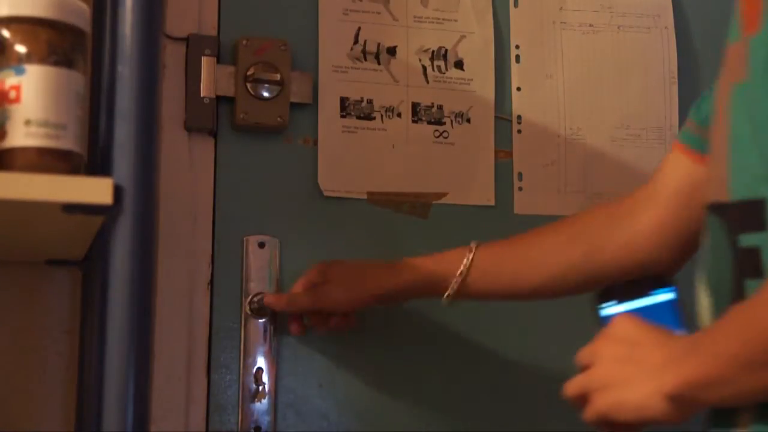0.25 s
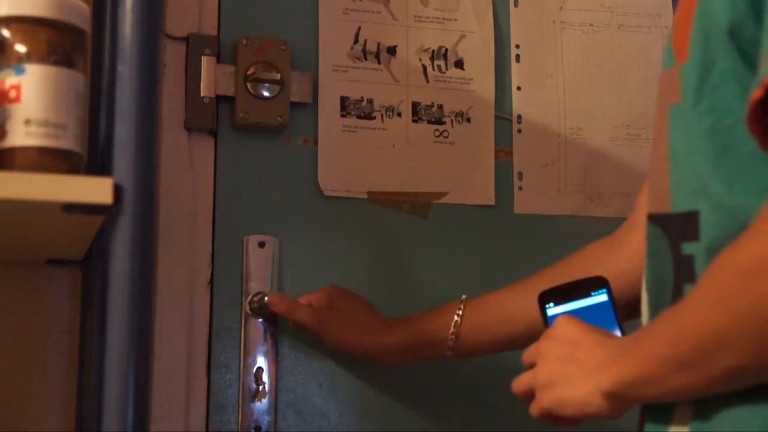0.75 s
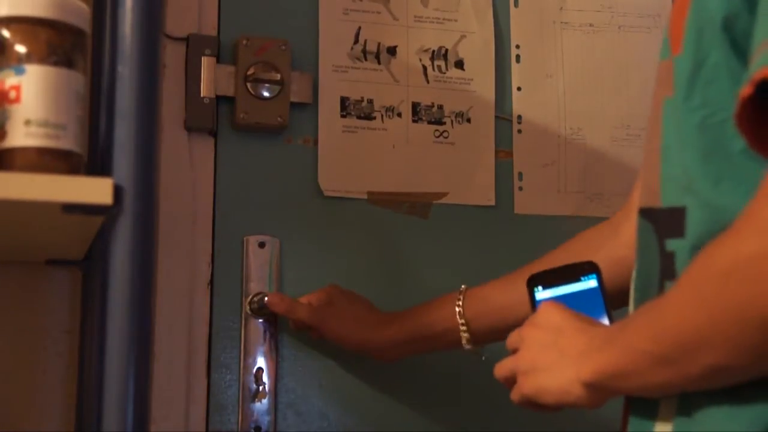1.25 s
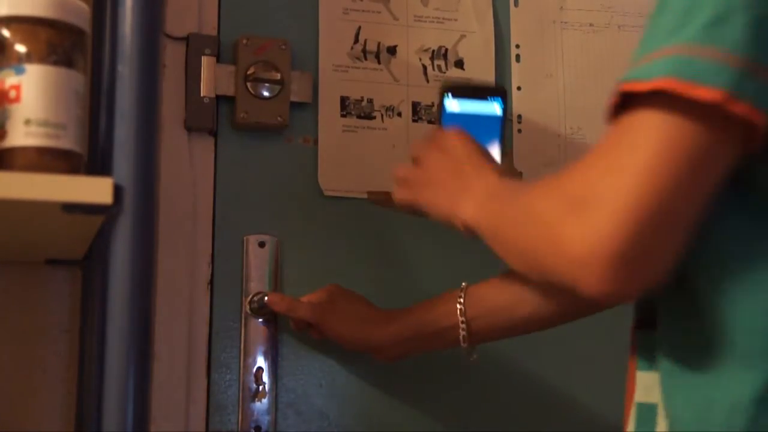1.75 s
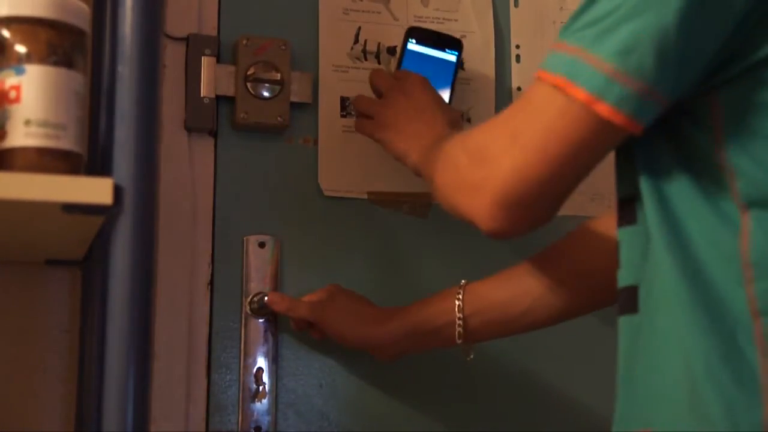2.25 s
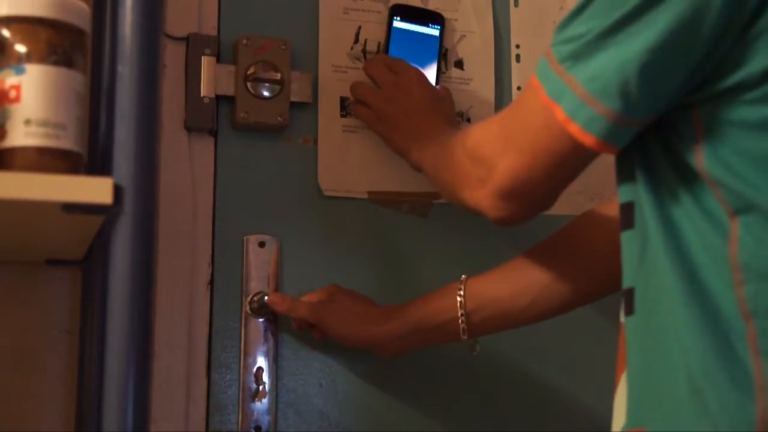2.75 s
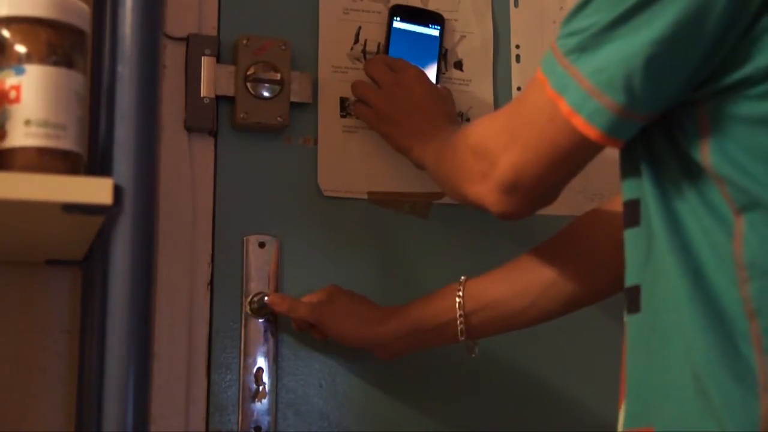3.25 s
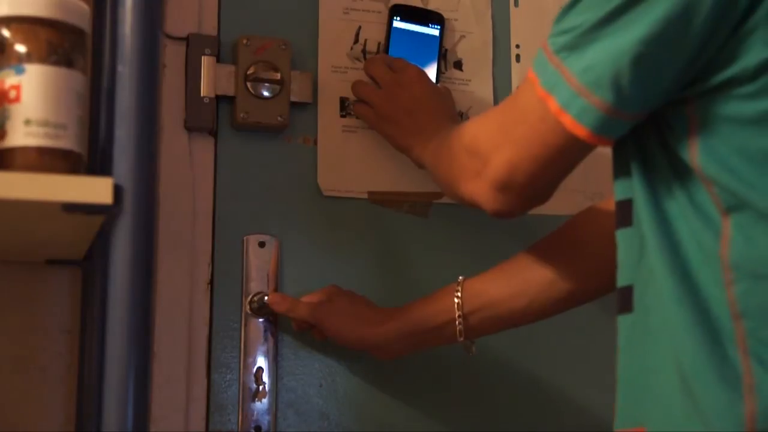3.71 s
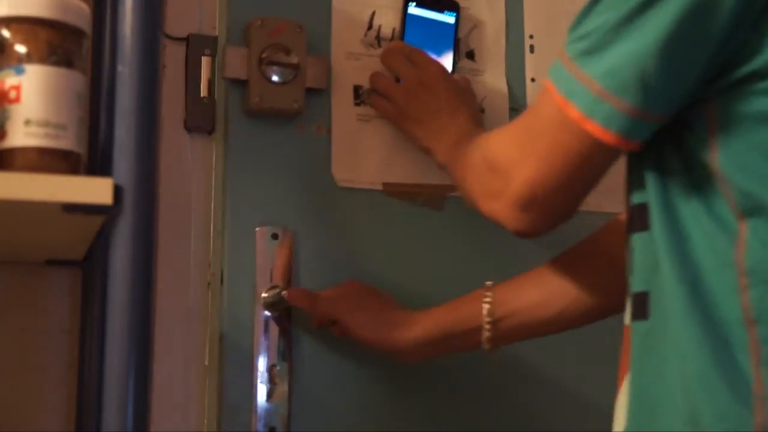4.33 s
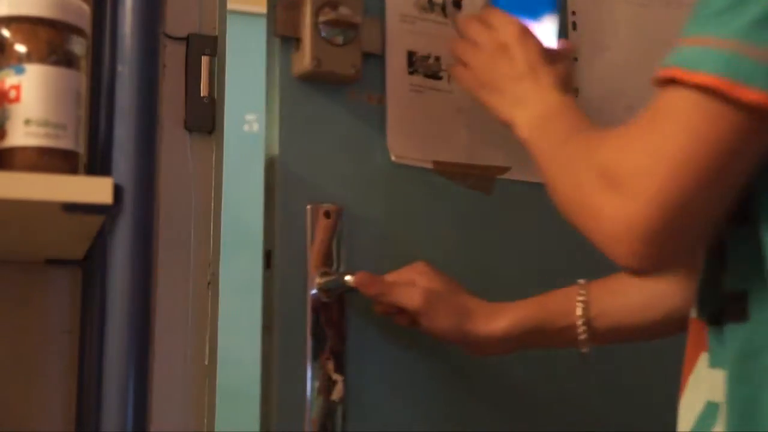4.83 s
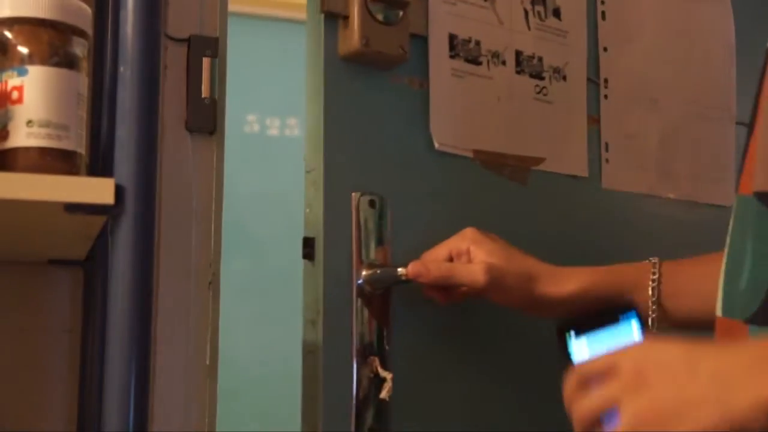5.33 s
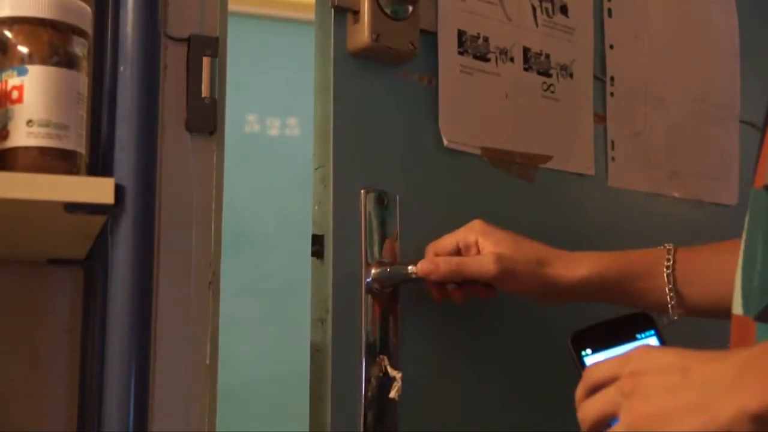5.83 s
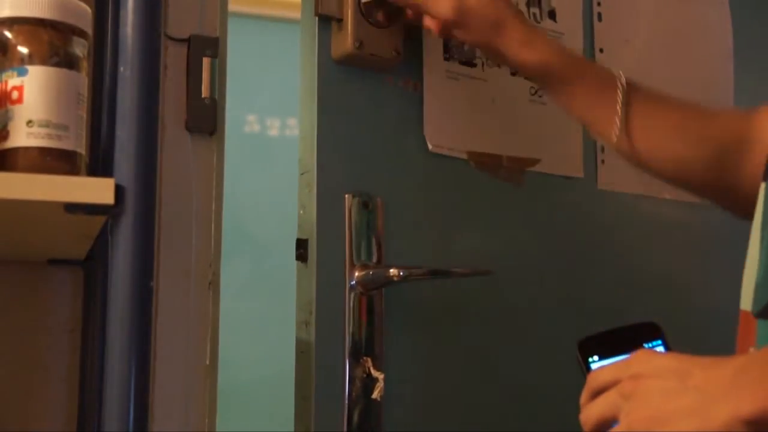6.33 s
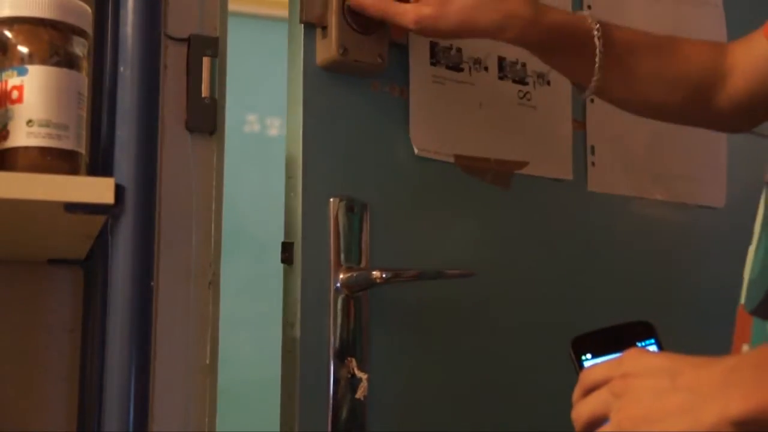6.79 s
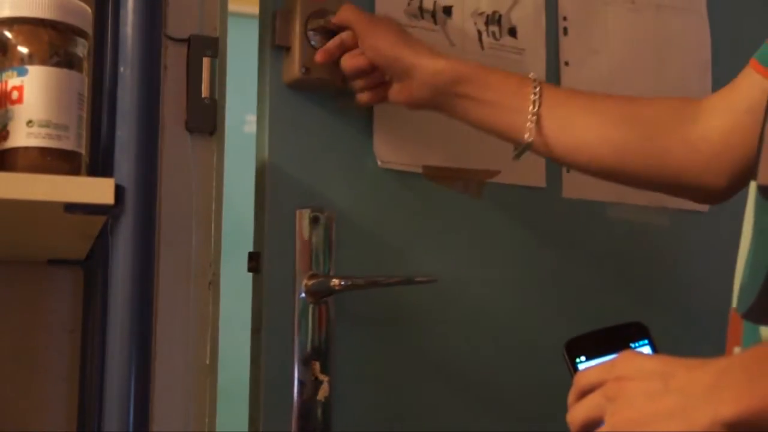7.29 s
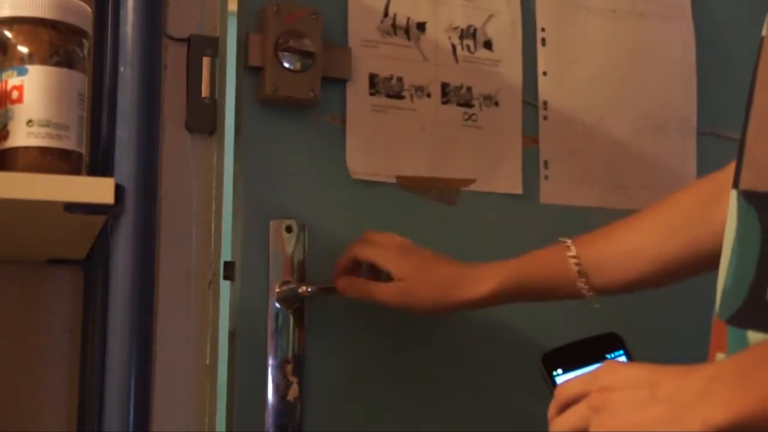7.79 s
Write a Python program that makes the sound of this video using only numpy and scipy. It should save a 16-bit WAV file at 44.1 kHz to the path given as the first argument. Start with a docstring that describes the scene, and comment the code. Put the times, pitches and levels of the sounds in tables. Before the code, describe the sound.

A faint hiss and soft, patchy rustling of cloth and paper run throughout, heard from close to a door in a small, hard-walled room. From about 0.2 to 1.2 seconds, a lever handle is worked, making a cluster of light knocks, metal scrapes and clicks on the hollow door. Scattered small clicks and taps follow, with a sharper click at 3.6 seconds. At about 4.2 seconds the bolt grinds and snaps back with a sharp clack, by far the loudest sound, thumping the door. Around 4.9 to 5.3 seconds the hinge gives one thin, very high squeak among light clicks and scrapes. Faint taps continue, then a firmer click and knock come at 6.7 seconds, a double knock at 7.3, and a last light knock near 7.8. Each contact has a short room echo and a faint, longer stairwell tail.

```python
"""Soft rustling and light knocks, then the clicks of a lever handle and rim latch worked on a hollow door
in a small hard room. Midway the bolt snaps back with a clack, and the hinge squeaks once.
Each contact is a short rattle that rings the metalwork or thumps the door leaf.
The microphone stands in a nook by a shelf, whose reflections notch everything that it hears;
the walls answer from close by, a stairwell from farther off."""
import sys
import numpy as np
from scipy import signal
from scipy.fft import rfft, irfft, next_fast_len
from scipy.io import wavfile

SR = 44100
rng = np.random.default_rng(int(sys.argv[2]) if len(sys.argv) > 2 else 0)


def generate_wav(signal):
    """Clip the signal to [-1, 1] and save it as 16-bit WAV at the path in sys.argv[1]."""
    frames = np.transpose(np.atleast_2d(signal))
    scaled = np.clip(frames, -1, 1) * 32767
    pcm = np.round(scaled).astype(np.int16)
    wavfile.write(sys.argv[1], SR, pcm)


N = 355137


def from_db(db):
    """Decibels to gain."""
    return 10 ** (np.asarray(db) / 20)


def unit_rms(x):
    """Scale to unit rms."""
    return x / np.sqrt(np.mean(x ** 2) + 1e-20)


def in_time(rows):
    """Columns of a timed curve, one value a sample."""
    times, *columns = np.transpose(rows)
    return [np.interp(np.arange(N) / SR, times, column) for column in columns]


def at_hz(points, hz):
    """Read a curve on a log-frequency axis."""
    point_hz, values = np.transpose(points)
    return np.interp(np.log(np.maximum(hz, 1)), np.log(point_hz), values)


def colour(x, spectrum):
    """Shape a signal by a dB spectrum."""
    size = next_fast_len(x.shape[-1])
    hz = np.arange(size // 2 + 1) * SR / size
    return irfft(rfft(x, size) * from_db(at_hz(spectrum, hz)), size)[..., :x.shape[-1]]


def drift(rate_hz):
    """Slow random wander of unit rms."""
    pole = np.exp(-2 * np.pi * rate_hz / SR)
    wander = signal.lfilter([1], [1, -2 * pole, pole * pole], rng.standard_normal(N + SR))
    return unit_rms(wander[SR:])


# Likeness of left and right at the microphone: (frequency [Hz], correlation [0..1])
LIKENESS = [(60, 0.4), (180, 1), (550, 0.87), (1650, 0.28), (4970, 0.03), (15000, 0.046)]
def stereo_noise(size):
    """White noise, alike in both channels in the bass and nearly unrelated in the treble."""
    mid, side = rfft(rng.standard_normal((2, size)))
    alike = np.clip(at_hz(LIKENESS, np.arange(len(mid)) * SR / size), -1, 1)
    left_right = np.sqrt(1 + alike) * mid + np.sqrt(1 - alike) * side * [[1], [-1]]
    return irfft(left_right, size) / np.sqrt(2)


# Noise floor at the microphone: (frequency [Hz], relative density [dB])
HISS_SPECTRUM = [(35, -52), (60, -41), (212, -13.5), (281, -9), (607, -8.5), (842, -0.5), (1380, -14.5),
                 (1860, -13), (7400, -15.5), (14200, -36), (16000, -57)]
def hiss():
    """Faint steady noise, unrelated between the channels."""
    return from_db(-59.5) * unit_rms(colour(rng.standard_normal((2, N)), HISS_SPECTRUM))


# Air moving right at the microphone: (time [s], level [dB])
AIR_LEVELS = [(0.0, -85), (0.38, -87), (0.4, -74), (0.61, -71), (0.81, -83), (0.94, -67), (1.03, -68),
              (1.12, -57), (1.25, -68), (1.46, -83), (1.52, -81), (1.64, -68), (1.68, -68), (1.88, -74),
              (2.04, -71), (2.13, -77), (2.24, -83), (2.73, -82), (2.94, -89), (3.11, -83), (3.27, -82),
              (3.38, -84), (3.92, -92), (4.06, -84), (4.19, -68), (4.26, -71), (4.39, -87), (4.59, -89),
              (5.16, -87), (5.31, -79), (5.45, -96), (6.19, -81), (7.67, -91), (7.73, -83), (7.98, -84),
              (8.05, -80)]
def air_rumble():
    """Moving air presses unevenly on the microphone's ports."""
    level_db, = in_time(AIR_LEVELS)
    low_band = signal.butter(3, [18, 62], "band", fs=SR, output="sos")
    return from_db(level_db) * unit_rms(signal.sosfilt(low_band, stereo_noise(N)))


# Brushing, heard dry at the microphone: (time [s], dull level [dB], bright level [dB])
RUSTLE_LEVELS = [(0.0, -59.5, -54), (0.13, -64.5, -65.5), (0.27, -62.5, -63), (0.56, -59.5, -65),
                 (0.74, -50, -56.5), (0.9, -62.5, -64.5), (1.12, -44, -57.5), (1.23, -45, -48),
                 (1.34, -62, -62.5), (1.7, -64.5, -65.5), (1.99, -57.5, -62.5), (2.33, -69.5, -71.5),
                 (2.64, -61, -66.5), (2.78, -62.5, -63.5), (3.25, -65.5, -72.5), (3.65, -63.5, -61),
                 (3.97, -68.5, -71.5), (4.21, -58.5, -64), (4.33, -42.5, -40), (4.37, -50, -44),
                 (4.66, -58, -59.5), (4.91, -61, -59.5), (5.07, -63, -66), (5.2, -59, -55),
                 (5.34, -48.5, -65), (5.67, -65, -67.5), (6.1, -61, -65), (6.41, -65.5, -71),
                 (6.68, -63.5, -66), (6.88, -55, -61), (7.13, -66.5, -67.5), (7.35, -53, -65),
                 (7.46, -44, -49.5), (7.55, -55.5, -54), (7.76, -58, -64), (8.05, -59, -62.5)]
# Colours of its two layers: (frequency [Hz], relative density [dB])
DULL_SPECTRUM = [(71, -77), (120, -28.5), (271, -13), (547, -5), (597, -9.5), (872, -9), (1600, -16.5),
                 (2080, -33), (3520, -120)]
BRIGHT_SPECTRUM = [(760, -17), (1300, 1), (2670, -0.5), (3550, -8), (3850, -2), (5400, -7.5), (9000, -25.5),
                   (11700, -69), (19800, -120)]
def rustle():
    """Cloth, skin and paper brush in patches: a dull and a bright noise, each flickering."""
    dull_db, bright_db = in_time(RUSTLE_LEVELS)
    dull = unit_rms(colour(stereo_noise(N), DULL_SPECTRUM))
    dull *= from_db(dull_db + 2.5 + 2.26 * drift(16))
    bright = unit_rms(colour(stereo_noise(N), BRIGHT_SPECTRUM))
    bright *= from_db(bright_db + 5.5 + 1.13 * drift(20.5))
    return dull + bright


# Decay of the small room around the microphone: (frequency [Hz], t60 [s])
ROOM_T60 = [(150, 0.28), (400, 0.24), (1000, 0.26), (2800, 0.19), (7000, 0.22), (14000, 0.17)]
ECHO_OVER_DIRECT_DB, STAIRWELL_DB, STAIRWELL_T60_RATIO = 3, -25.5, 4.3
def room(source):
    """Direct sound, dense near echoes dying band by band, and the longer tail of the stairwell."""
    t = np.arange(SR) / SR
    noise, tail = stereo_noise(SR), 0
    edges_hz = 60 * 2 ** np.arange(0, 8.6, .5)   # half octaves
    for low, high in zip(edges_hz, np.minimum(edges_hz[1:], .45 * SR)):
        band = signal.sosfilt(signal.butter(2, [low, high], "band", fs=SR, output="sos"), noise)
        t60 = at_hz(ROOM_T60, np.sqrt(low * high))
        walls = from_db(-60 * t / t60) / np.sqrt(t60)
        stairwell = from_db(STAIRWELL_DB - 60 * t / t60 / STAIRWELL_T60_RATIO)
        tail = tail + band * (walls + stairwell)
    tail *= np.clip(t / 0.0028, 0, 1)   # echoes need time to arrive
    tail = from_db(ECHO_OVER_DIRECT_DB) * tail / np.sqrt(np.sum(tail ** 2) / 2)
    direct = np.stack([source, np.roll(source, 3)])   # reaches the right side 3 samples later
    return direct + signal.fftconvolve(source[None], tail, axes=1)[:, :N]


# Squeak at the hinge side of the door: (time [s], pitch [Hz], level [dB])
SQUEAK = [(4.92, 5408, -70), (4.936, 5617, -55), (4.968, 5571, -47), (5.096, 5846, -39), (5.106, 5846, -71),
          (5.146, 5836, -47), (5.214, 5756, -67), (5.298, 5711, -51), (5.33, 5680, -76)]
def hinge(octave_db=-30):
    """Stick-slip locked to one pin resonance: a throbbing whistle with a faint octave."""
    hz, level_db = in_time(SQUEAK)
    t = np.arange(N) / SR
    turning = (t > SQUEAK[0][0]) & (t < SQUEAK[-1][0])
    phase = 2 * np.pi * np.cumsum(hz * (1 + 0.0078 * drift(56))) / SR
    tone = np.sin(phase) + from_db(octave_db) * np.sin(2 * phase)
    return turning * from_db(level_db + 2.5 * drift(40)) * tone


def rattle(times, levels_db, rises, size=4000):
    """Each contact is a burst of uneven micro-impacts that swells and dies; its level sets its energy."""
    force = np.full(N, 1e-18)
    shape = (len(times), size)
    grains = rng.standard_normal(shape) * from_db(3.1 * rng.exponential(1, shape))
    for time, level_db, rise, impacts in zip(times, levels_db, rises, grains):
        age = np.arange(size) / SR / np.clip(rise, .0004, .02)
        burst = impacts * age * np.exp(-age)
        burst *= from_db(level_db) / np.sqrt(np.sum(burst ** 2))
        start = round(time * SR)
        force[start:start + size] += burst[:N - start]
    return force


def ring(force, modes):
    """A force sets every mode of a body ringing; nothing radiates far below the lowest mode."""
    body = 0
    for k, (hz, level_db, t60) in enumerate(modes):
        pole, angle = from_db(-60 / (t60 * SR)), 2 * np.pi * hz / SR
        mode = signal.lfilter([0, np.sin(angle)], [1, -2 * pole * np.cos(angle), pole * pole], force)
        body = body + (-1) ** k * from_db(level_db) * mode
    low_cut = signal.butter(4, 0.77 * modes[0][0], "high", fs=SR, output="sos")
    return signal.sosfilt(low_cut, body)


# Knocks at the door: (time [s], case level [dB], leaf level [dB], frame level [dB], rattle rise [s])
KNOCKS = [(0.207, -51, -53, -73, 0.007), (0.268, -42.5, -49, -67.5, 0.0074), (0.439, -55, -57, -59, 0.0043),
          (0.559, -41, -42, -65, 0.0082), (0.68, -36, -41, -57, 0.0081), (0.697, -32, -44, -61, 0.007),
          (0.842, -40, -43, -61, 0.007), (0.919, -54, -40, -62, 0.0053), (1.056, -38, -45, -54, 0.007),
          (1.102, -28, -37, -43, 0.0059), (1.201, -34, -43, -50.5, 0.007), (1.511, -47.5, -47, -54, 0.0058),
          (1.549, -49, -51, -55, 0.0087), (1.619, -49, -48, -56, 0.0048), (1.844, -46, -46.5, -57, 0.007),
          (1.935, -33.5, -39, -61, 0.0052), (2.144, -47.5, -63, -78, 0.007),
          (2.635, -38.5, -50, -45, 0.0088), (2.853, -40.5, -58, -70, 0.0049),
          (3.413, -45.5, -57, -77, 0.0063), (3.613, -33.5, -58, -73, 0.0059),
          (4.191, -18, -29.5, -37, 0.0074), (4.23, -15, -25, -48.5, 0.0062), (4.844, -37, -56, -73, 0.0051),
          (4.975, -39.5, -53, -74, 0.0057), (5.161, -40, -61, -71, 0.0061),
          (5.199, -43, -60, -76.5, 0.0079), (5.274, -37, -44.5, -55, 0.007),
          (5.598, -43.5, -46, -68, 0.0056), (5.829, -46, -55, -66, 0.0056),
          (5.928, -41.5, -59, -70, 0.0085), (6.016, -48, -55, -76, 0.0085), (6.207, -40, -59, -74, 0.0049),
          (6.695, -24.5, -40, -73, 0.0074), (6.703, -29, -46, -71, 0.0051),
          (7.303, -27, -31.5, -64, 0.0082), (7.343, -24, -30.5, -59, 0.0055),
          (7.752, -36, -44, -55, 0.0048)]
# Modes of the parts they shake: (frequency [Hz], level [dB], t60 [s])
CASE_MODES = [(684, 1.5, 0.057), (795, -1.5, 0.043), (864, -2.5, 0.049), (940, 1, 0.052),
              (1060, -1.5, 0.045), (1126, -3.5, 0.048), (1248, -2.5, 0.033)]
LEAF_MODES = [(306, -2.5, .1), (358, -3.5, 0.1), (411, 0.5, 0.13), (471, 1.5, 0.094), (544, -1, 0.11)]
FRAME_MODES = [(135, -5.5, .15), (163, -1.5, 0.15), (200.4, 3, 0.21)]
def door():
    """Knocks ring the lock case, the hollow leaf and the frame."""
    times, case_db, leaf_db, frame_db, rises = np.transpose(KNOCKS)
    case = ring(rattle(times, case_db, rises), CASE_MODES)
    leaf = ring(rattle(times, leaf_db, rises), LEAF_MODES)
    frame = ring(rattle(times, frame_db, rises), FRAME_MODES)
    return from_db(-3.5) * case + from_db(-1) * leaf + from_db(-0.5) * frame


# Sharp clicks at the latch, and slips where its parts grind over each other:
# (time [s], plate level [dB], bolt level [dB], tick level [dB], rattle rise [s])
CLICKS = [(0.844, -31.5, -36, -51, 0.0009), (1.1993, -26, -28.5, -39, 0.00098),
          (1.938, -32.5, -35, -50, 0.0012), (2.6255, -39.5, -39, -53, 0.0012),
          (2.842, -44, -44, -39, 0.0012), (3.41, -48, -46, -50, 0.0012), (3.6095, -23, -24, -26, 0.0016),
          (4.23, -6, -9, -5, 0.0012), (4.666, -43, -40, -59, 0.0012), (4.8414, -31.5, -34, -38, 0.00075),
          (5.1603, -41.5, -38, -46, 0.0017), (6.203, -42, -38, -51, 0.0014),
          (6.6925, -31.5, -34, -40, 0.0012), (7.342, -26, -28, -35, 0.0015)]
SLIPS = [(0.27, -53, -50, -55, 0.0082), (0.56, -44, -48, -62, .012), (0.692, -35.5, -35, -35, 0.0044),
         (1.0, -61, -58, -65, 0.0046), (1.058, -26, -31.5, -49, 0.0057), (1.102, -39, -53, -60, .006),
         (1.184, -30, -37, -48, 0.0083), (1.375, -57, -48, -63, 0.0062), (2.14, -51, -54, -62, 0.0044),
         (2.852, -42, -43, -43, 0.004), (4.188, -12, -15, -20, 0.0062), (4.236, -13, -17, -20, 0.0086),
         (4.826, -36, -35, -30, 0.0074), (4.967, -42, -40, -42, 0.0064), (5.19, -46, -53, -57, .012),
         (5.23, -44, -49, -60, .012), (5.274, -41, -47, -58, .012), (5.32, -45, -49, -60, 0.0095),
         (5.385, -67, -65, -54, .008), (6.698, -39, -39, -51, 0.0043), (7.306, -37, -44, -62, 0.0097),
         (7.743, -38, -50.5, -62, 0.0047)]
# Modes of the lever plate and the bolt: (frequency [Hz], level [dB], t60 [s])
PLATE_MODES = [(1674, -1, 0.033), (1801, 1, 0.045), (1970, 0.5, 0.039), (2080, -4.5, 0.057),
               (2227, 0, 0.025)]
BOLT_MODES = [(2670, 1, 0.016), (2970, -1, 0.029), (3274, -1, 0.021), (3800, 1, 0.022), (4150, 1.5, 0.024),
              (4500, -2, .02), (4990, 1, 0.0093)]
# Tick of metal on metal: (frequency [Hz], gain [dB])
TICK_SPECTRUM = [(4000, -35), (5200, 6), (7700, 8.5), (9500, -7), (12500, -22), (16000, -21)]
def latch(contacts):
    """Lever plate and bolt ring briefly; the contact itself ticks in the treble."""
    times, plate_db, bolt_db, tick_db, rises = np.transpose(contacts)
    plate = ring(rattle(times, plate_db, rises), PLATE_MODES)
    bolt = ring(rattle(times, bolt_db, rises), BOLT_MODES)
    tick = colour(rattle(times, tick_db, rises), TICK_SPECTRUM)
    return from_db(-3) * plate + from_db(0.5) * bolt + from_db(23.5) * tick


def scene():
    """Over hiss, rumble and rustle, two places on the door sound, each with its own echoes."""
    noise_floor = hiss()
    clicks_and_squeak = room(latch(CLICKS) + hinge())
    slips_and_knocks = room(latch(SLIPS) + door())
    return noise_floor + rustle() + air_rumble() + from_db(-1.5) * (clicks_and_squeak + slips_and_knocks)


# Four notches and a slight treble lift in the nook: (frequency [Hz], width [Hz], gain [dB])
NOOK_BANDS = [(595, 97, -13), (1372, 230, -17), (2373, 304, -39), (3380, 200, -12), (10350, 2000, 1)]
CUTOFF_HZ = 15900
def record(dry):
    """At the microphone the shelf's reflections cut notches; peaks are rounded and the top is cut."""
    for hz, width_hz, gain_db in NOOK_BANDS:
        width, gain = np.tan(np.pi * width_hz / SR), from_db(gain_db)
        centre = -2 * np.cos(2 * np.pi * hz / SR)
        dry = signal.lfilter([1 + gain * width, centre, 1 - gain * width], [1 + width, centre, 1 - width], dry)
    rounded = 0.97 * np.tanh(dry / 0.84)
    return signal.sosfilt(signal.cheby2(12, 70, CUTOFF_HZ, fs=SR, output="sos"), rounded)


dry = scene()
out = record(dry)
generate_wav(out)
```